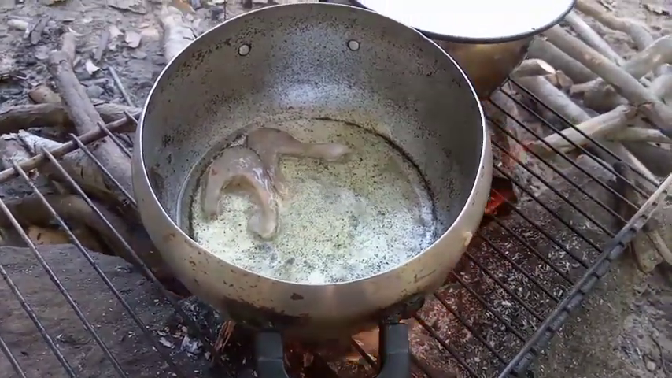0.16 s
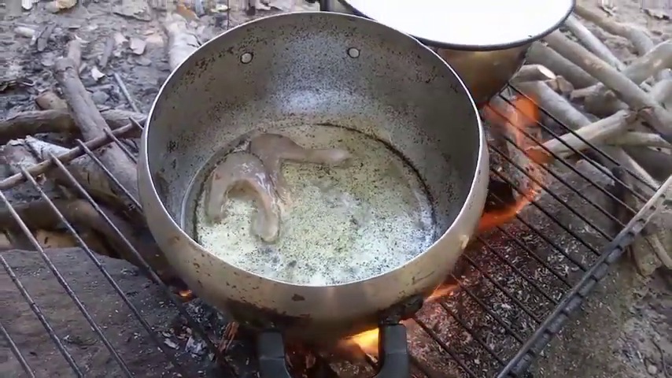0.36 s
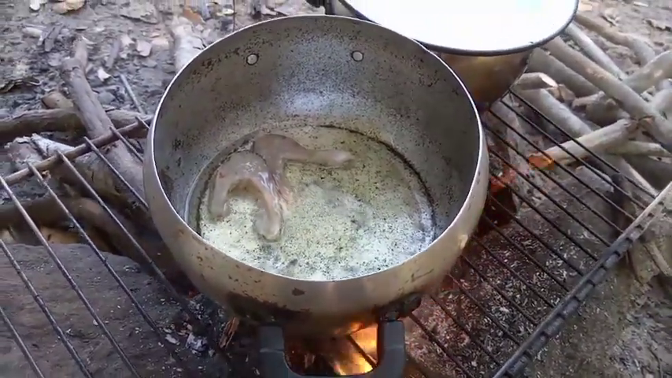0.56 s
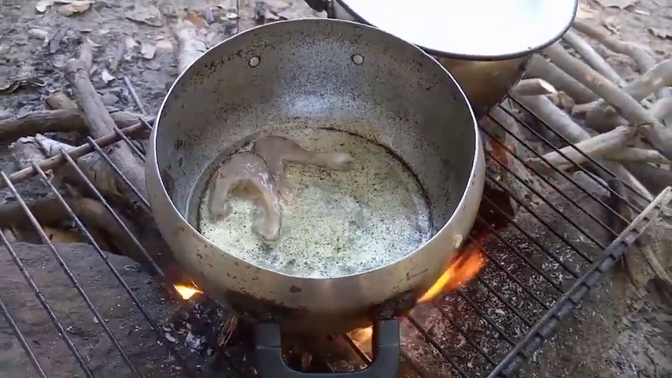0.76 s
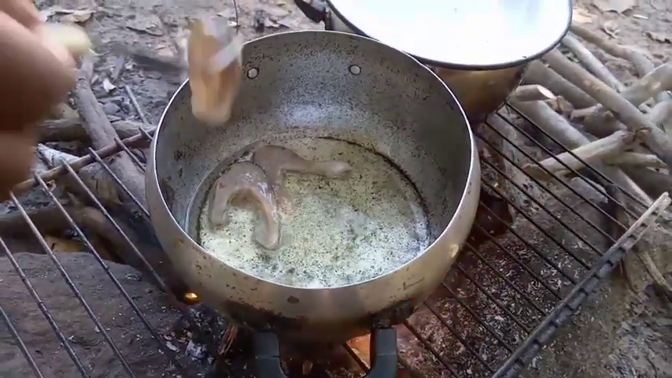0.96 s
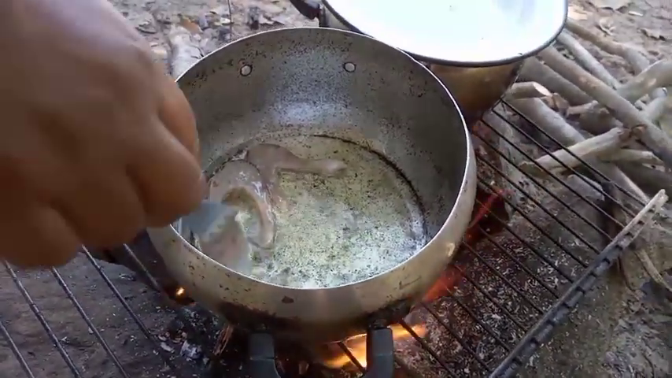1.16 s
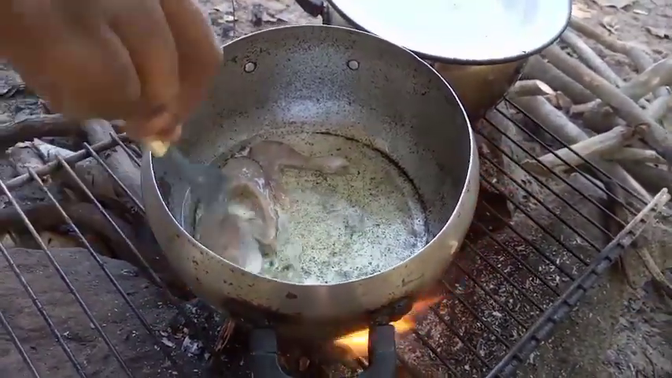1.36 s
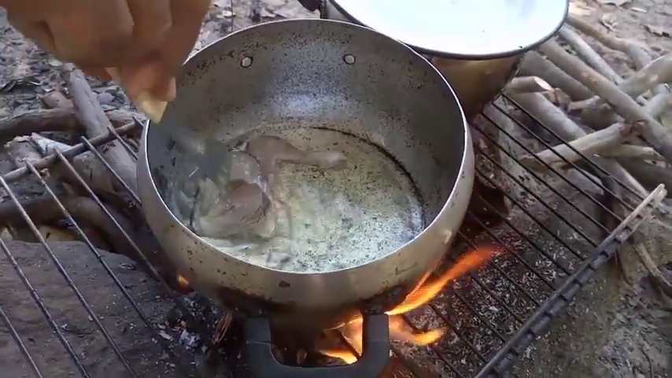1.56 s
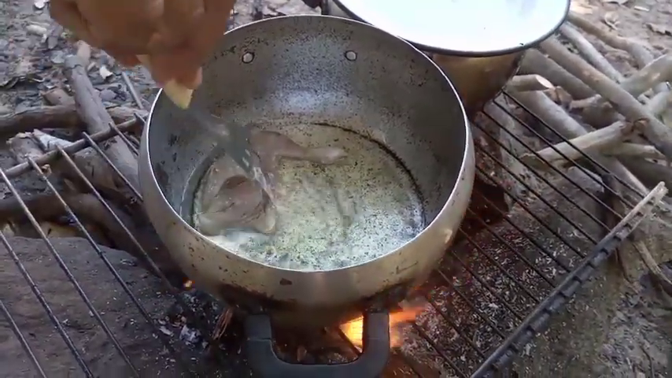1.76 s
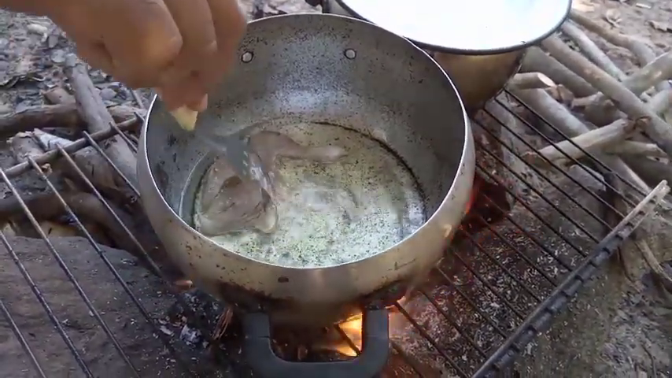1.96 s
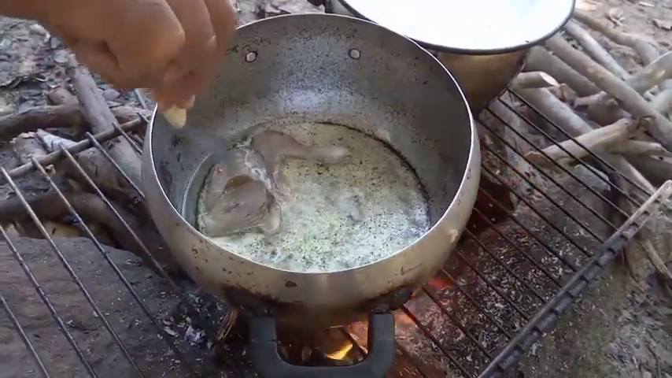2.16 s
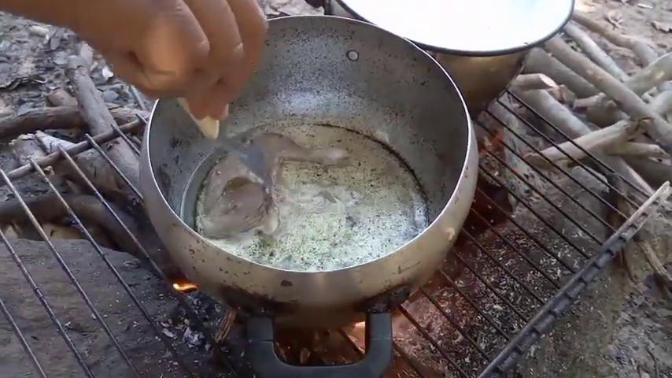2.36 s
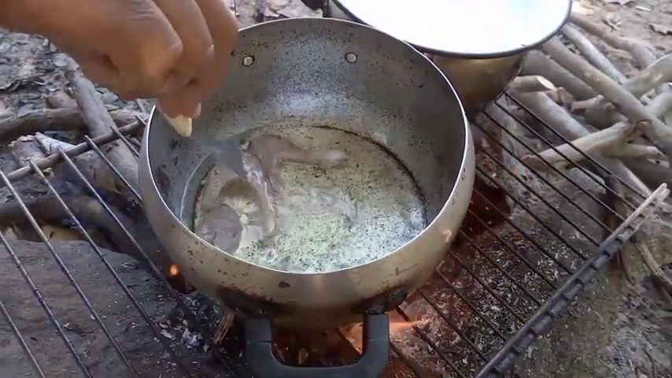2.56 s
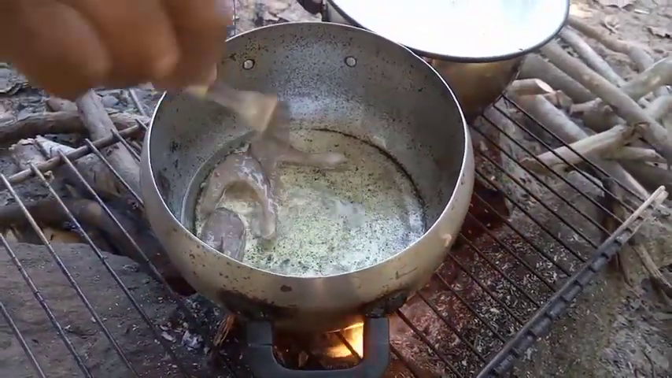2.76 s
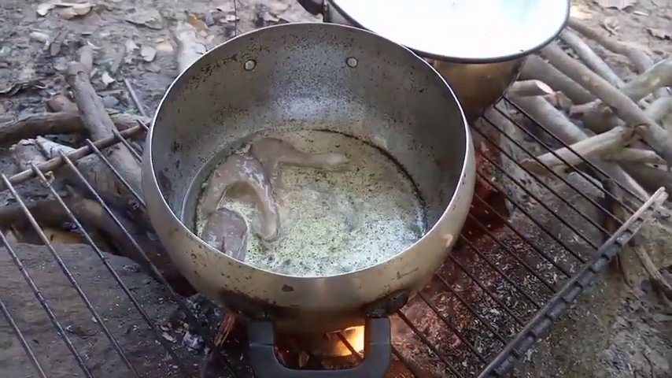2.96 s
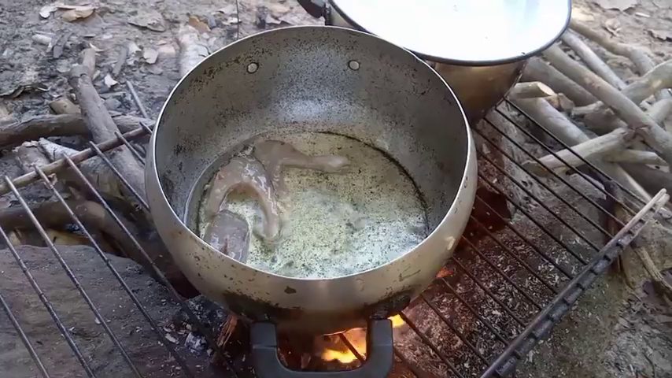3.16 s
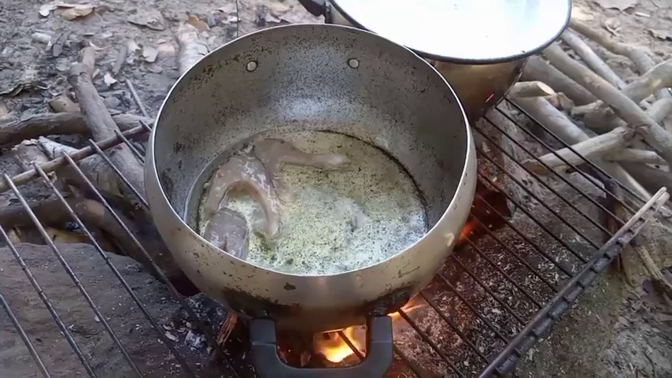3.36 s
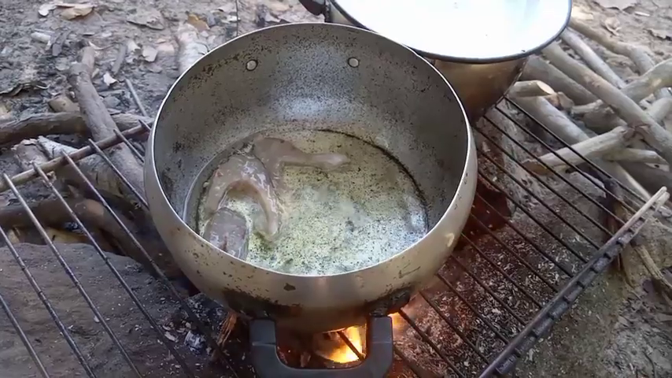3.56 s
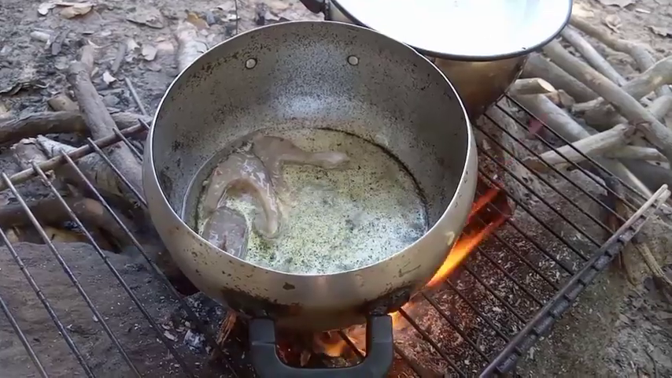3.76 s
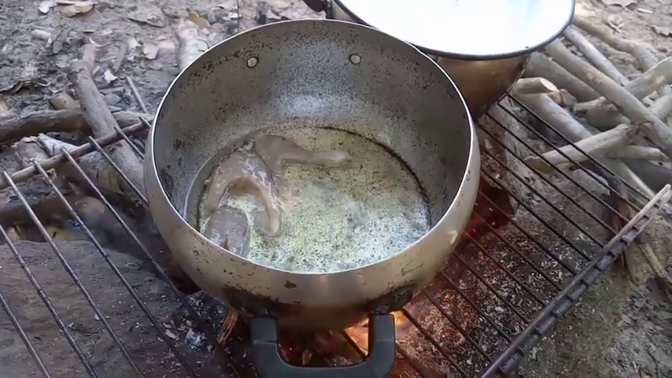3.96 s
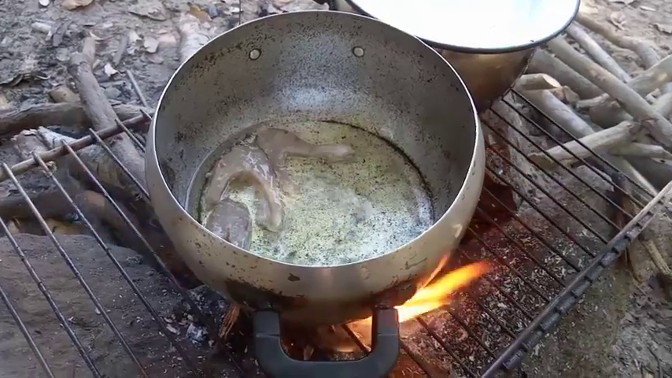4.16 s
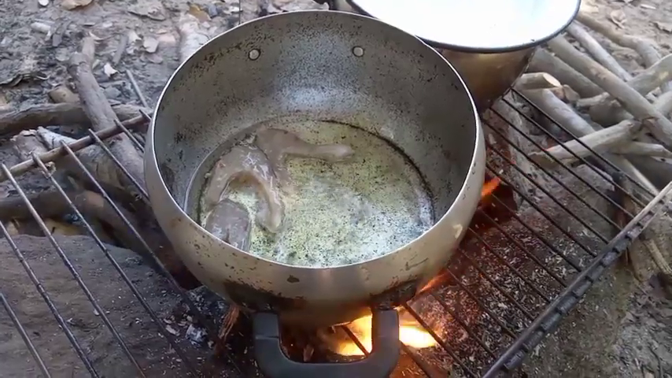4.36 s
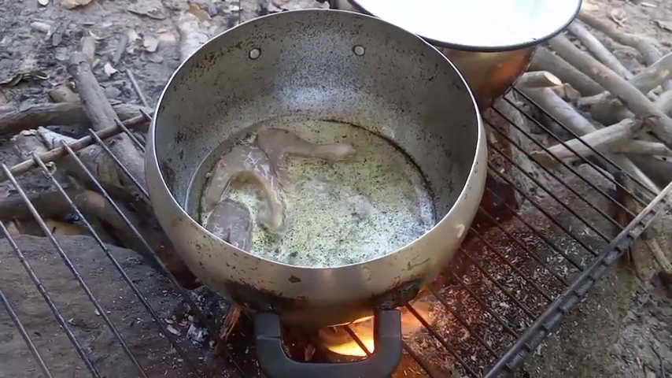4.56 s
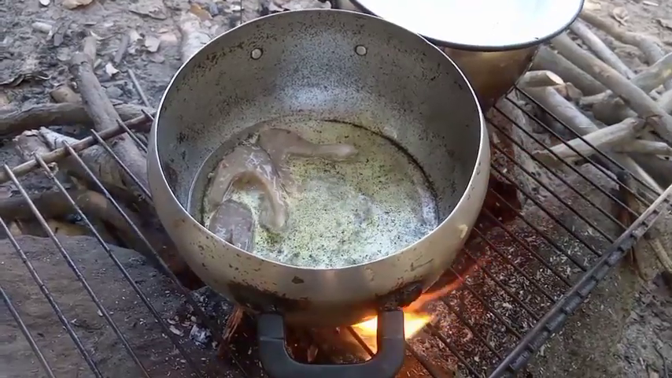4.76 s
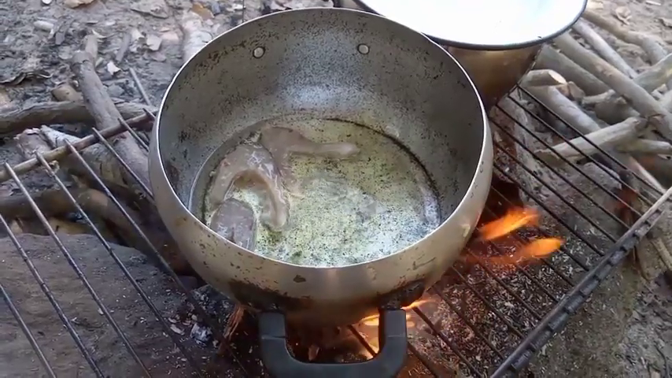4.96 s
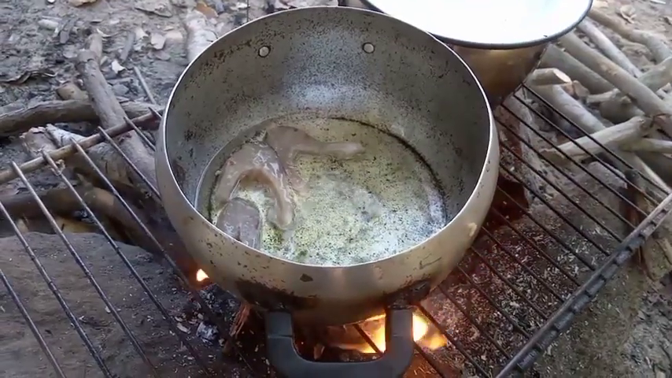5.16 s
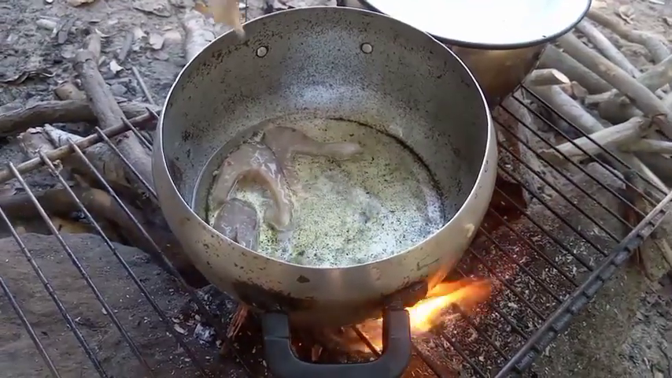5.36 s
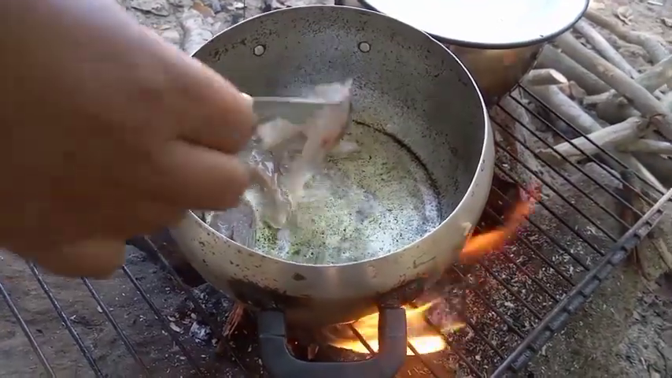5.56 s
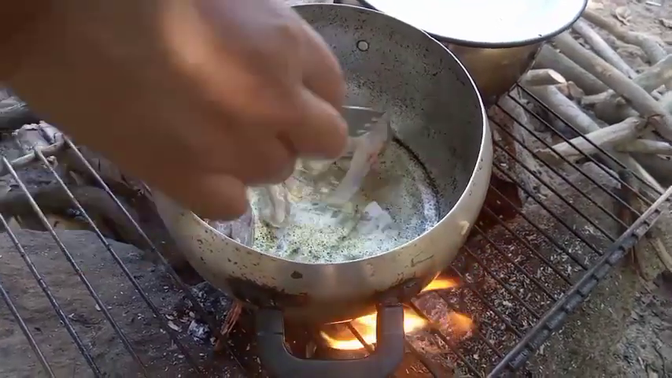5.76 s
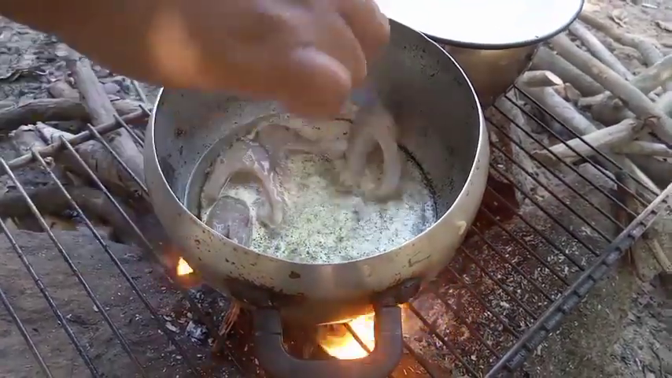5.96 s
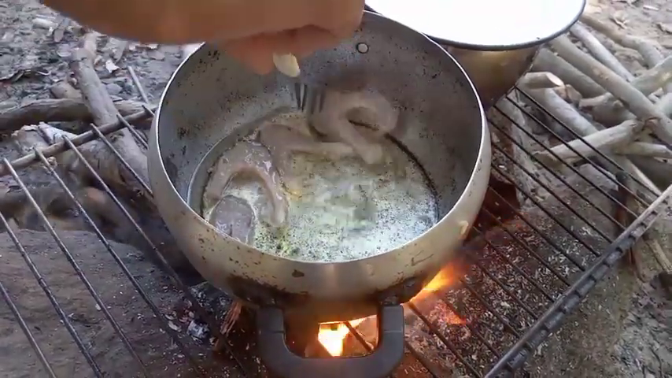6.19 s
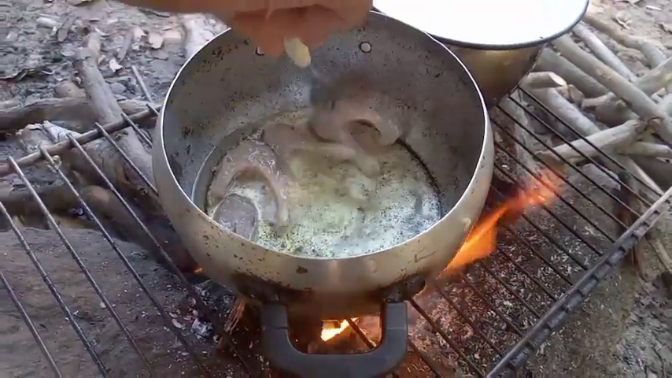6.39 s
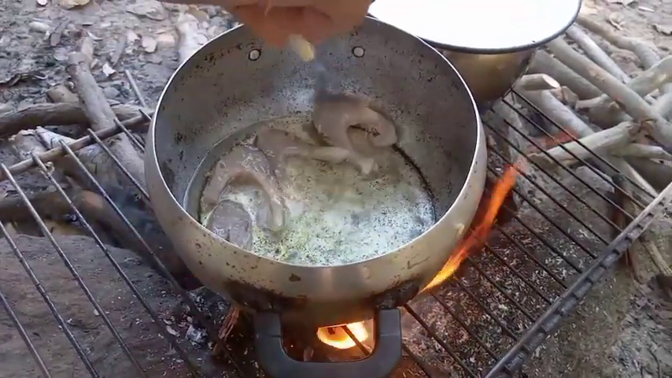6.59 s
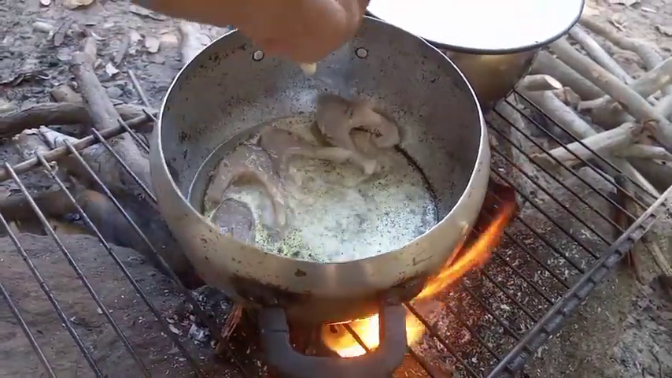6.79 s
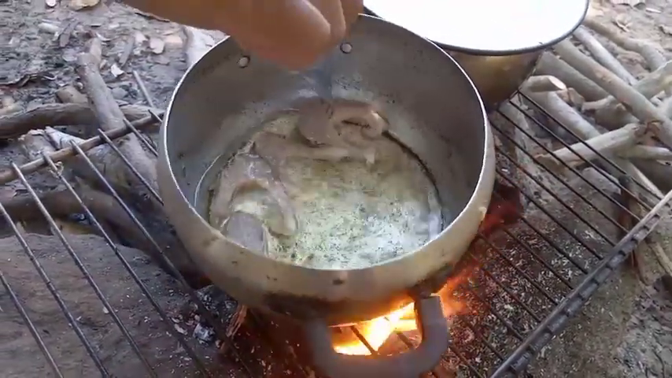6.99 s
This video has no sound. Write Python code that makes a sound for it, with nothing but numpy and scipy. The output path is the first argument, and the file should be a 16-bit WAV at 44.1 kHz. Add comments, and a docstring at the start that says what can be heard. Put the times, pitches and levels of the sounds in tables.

```python
"""Fish fries in a thin layer of oil in a deep metal pot over a wood fire, outdoors.
Water drops burst as ringing steam bubbles and torn oil film: bright pops and wetter spits, over a fine fizz of
bubble grains and noise. Echoes and resonant filters make the pot throw the bursts back and ring briefly.
Near the end a fresh piece flashes into a loud hiss of steam. Filtered noise makes the fire's rumble, the hollow
air and a faint hum; short clicks make the snaps of the wood."""
import sys
import numpy as np
from scipy import signal
from scipy.fft import rfft, irfft, next_fast_len
from scipy.io import wavfile

SR = 44100
rng = np.random.default_rng(int(sys.argv[2]) if len(sys.argv) > 2 else 0)


def put_to_file(sound):
    """Save the sound as 16-bit audio at rate SR, in the file named by the first command-line argument."""
    columns = np.atleast_2d(sound).T  # one column per channel
    safe = np.clip(columns, -1, 1)
    whole_steps = np.round(safe * 32767)
    wavfile.write(sys.argv[1], SR, whole_steps.astype(np.int16))


N = 310023
TIME = np.arange(N) / SR  # s
BURST_TIME = np.arange(2048) / SR  # s, the span of one burst
LEVEL_WINDOW = .01 * SR  # samples in 10 ms

# Loud steam bursts. Each row: start in seconds, reference level in dB (rms over 10 ms), bubble pitch in Hz,
# splash in dB against that level.
LOUD_POPS = [(0.0326, -32.5, 5700, -2), (0.0735, -25.5, 6240, -23), (0.103, -28, 6540, -38),
             (0.1123, -28.5, 6200, -34), (0.2118, -34.5, 3020, 4), (0.304, -32.5, 6300, -14),
             (0.3313, -34.5, 4230, -15), (0.4103, -35.5, 3960, 2), (0.422, -32.5, 9800, -25),
             (0.5679, -31.5, 3380, -13), (0.6338, -29.5, 5000, -13), (0.671, -33.5, 4600, -16),
             (0.7685, -38, 5470, -10), (0.8108, -27.5, 5900, -31), (0.885, -34.5, 3740, -5),
             (0.904, -33.0, 6000, -14), (0.9365, -32.5, 6640, -1), (0.9429, -27.5, 6600, -21),
             (0.958, -30.5, 3760, -14), (0.9957, -30, 3060, -2), (1.0171, -28.5, 6100, -5),
             (1.096, -36, 9730, -29), (1.219, -33, 5870, 4), (1.289, -29, 4870, -10),
             (1.2953, -30.5, 3480, -10), (1.3042, -32, 4040, -17), (1.4556, -30.5, 7360, -26),
             (1.5063, -29, 6200, -30), (1.555, -26, 5620, -23), (1.5767, -27.5, 4000, -8),
             (1.638, -30, 5950, -25), (1.6734, -34, 5810, -15), (1.6985, -36, 6140, -14),
             (1.767, -24.5, 6000, -24), (1.8898, -30.0, 6000, -23), (1.968, -33.5, 5640, -4),
             (2.0705, -30, 6840, -14), (2.0993, -34, 5770, -21), (2.3174, -32, 3250, 0.5),
             (2.3483, -29, 3830, -4.5), (2.5663, -30, 3400, -1.5), (2.5852, -33.5, 3290, -2),
             (2.685, -31.5, 5260, -14), (2.7562, -29, 6600, -27), (2.877, -30.5, 6500, -25),
             (2.916, -35, 9000, -19), (2.959, -38, 4940, -5), (2.9876, -30.5, 3300, -1),
             (3.092, -34, 5130, -13), (3.1569, -28.5, 6100, -22), (3.1859, -26.5, 6200, -8),
             (3.3463, -29.5, 5100, -6), (3.425, -29.5, 6500, -25), (3.4492, -36, 4690, 2),
             (3.5037, -29.5, 7000, -15), (3.523, -38, 3200, 8.5), (3.825, -31.5, 6520, -9),
             (3.838, -35.5, 6000, -5), (3.9841, -37, 5350, -7), (4.0015, -31.5, 4350, -11),
             (4.0489, -34.5, 6300, -25), (4.1191, -28.5, 6050, -17), (4.138, -34.5, 5930, -2.5),
             (4.2172, -32.5, 6800, -14), (4.2605, -34, 6050, -15), (4.3644, -34.0, 5940, -18),
             (4.4134, -33.5, 6200, -29), (4.4999, -35.0, 10000, -16), (4.526, -31.0, 4300, -4),
             (4.5439, -23.5, 5520, -10), (4.561, -30.5, 5940, -3), (4.6866, -35.0, 8530, -27),
             (4.7925, -29.5, 3600, -9.5), (4.8873, -31, 5940, -30), (4.9166, -33.5, 4680, -6),
             (4.962, -31, 5700, -11), (5.063, -33, 3600, -3), (5.184, -33.5, 3230, -1.5),
             (5.286, -30.5, 6300, -17), (5.31, -34, 2960, -3), (5.3646, -32.5, 7320, -32),
             (5.4323, -33, 4800, -2), (5.4646, -33.5, 6100, 0), (5.4933, -26.5, 6240, -17),
             (5.7759, -34.5, 5870, -9), (5.998, -28.5, 6160, -7.5), (6.0637, -30.0, 5860, -11),
             (6.1266, -29, 5850, -21), (6.1417, -30.5, 6590, -25), (6.1695, -27, 5700, -12),
             (6.4616, -33, 4100, -13), (6.6832, -29, 5900, -0.5), (6.797, -35, 6120, -4),
             (6.8685, -29, 5720, -7), (6.9431, -33.5, 3700, -1), (6.9962, -36.5, 4720, -11)]
# Bands of the torn film: splash, snap, crack. Each row: lower edge in Hz, upper edge in Hz.
FILM_BANDS = [(2800, 5400), (5000, 6950), (8000, 10100)]
# parts of every pop, in dB against its reference level; the crack varies at random
BUBBLE_DB, SPLASH_DB, SNAP_DB, CRACK_DB, CRACK_SPREAD_DB = -2.5, -1.5, -2, -11.5, 2
# a wetter pop tears more film and rings less: dB of snap and of bubble per dB of splash
SNAP_PER_SPLASH, BUBBLE_PER_SPLASH = 0.22, -.1
MIST_HZ, MIST_DB = (13800, 15800), -30.5  # fine mist of oil: band, and level against the pop
LEAK_DB = -17.0  # steam leaking just before a pop, against its bubble
TEAR_S = .0018  # decay time of a tearing oil film


def pops(cycles=2.67, rise=0.0083, film_cutoff_hz=9500, leak_s=0.0014, balance_spread_db=0.5):
    """Explosive boiling: steam leaks, a bubble rings, its film tears; own echoes, tiny random left-right balance."""
    out = np.zeros((2, N))
    for s, level_db, hz, splash_db in list(LOUD_POPS) + small_pops():
        path = wall_echoes()
        ring_db = level_db + BUBBLE_DB + BUBBLE_PER_SPLASH * splash_db
        ring = bubble(hz, cycles * from_db(2 * rng.normal()), rise)
        pop = at_level(heard(ring, path), ring_db)

        dull = signal.butter(1, film_cutoff_hz, fs=SR, output="sos")
        film = signal.sosfilt(dull, heard(tear(TEAR_S), path))
        film_db = (SPLASH_DB + splash_db,
                   SNAP_DB + SNAP_PER_SPLASH * splash_db,
                   CRACK_DB + CRACK_SPREAD_DB * rng.normal())
        for (low_hz, high_hz), db in zip(FILM_BANDS, film_db):
            pop += at_level(band(film, low_hz, high_hz), level_db + db)
        pop += at_level(band(film, *MIST_HZ), level_db + MIST_DB)

        left_right = np.array([[.5], [-.5]])
        add(out, s, pop * from_db(balance_spread_db * rng.normal() * left_right))

        # played backwards: steam leaks faster and faster until the film gives way
        leak = at_level(band(tear(leak_s), 3600, 7700), ring_db + LEAK_DB)
        leak = leak[:len(BURST_TIME) // 2][::-1]
        add(out, s - len(leak) / SR, leak)
    return out


SMALL_DB, SMALL_SPREAD_DB = 5, 3.5  # level over the frying curve, and spread
SMALL_HZ, SMALL_SPREAD_OCTAVES = 6500, .45  # typical bubble pitch, and spread
SMALL_SPLASH_DB, SMALL_SPLASH_SPREAD_DB = -11, 1.5  # splash against the pop, and spread


def small_pops(count=100):
    """Random nucleation: weaker bursts come by chance, louder with the frying; columns as for the loud ones."""
    s = rng.uniform(0, TIME[-1], count)
    size, pitch, wetness = rng.standard_normal((count, 3)).clip(-2, 2).T
    frying_db = np.interp(s, *np.transpose(FRYING_VIGOUR))
    level_db = frying_db + SMALL_DB + SMALL_SPREAD_DB * size
    hz = SMALL_HZ * 2 ** (SMALL_SPREAD_OCTAVES * pitch)
    splash_db = SMALL_SPLASH_DB + SMALL_SPLASH_SPREAD_DB * wetness
    return list(zip(s, level_db, hz, splash_db))


def bubble(hz, cycles, rise):
    """Damped cavity oscillation: steam swells into ringing and dies within a few cycles, rising a little."""
    age = BURST_TIME * hz / cycles
    pitch = hz * (1 + rise * np.tanh(age / 2 - .5))
    return age * np.exp(-age) * np.sin(2 * np.pi * np.cumsum(pitch) / SR)


def tear(decay_s):
    """Film rupture: tearing oil gives a puff of noise that decays exponentially."""
    return rng.standard_normal(len(BURST_TIME)) * np.exp(-BURST_TIME / decay_s)


# Larger, wetter bursts. Each row: start in seconds, then relative levels in dB of cavity, spray and thud.
WET_SPITS = [(0.1491, -32.5, -38.5, -48), (0.2134, -45, -33.5, -53), (0.3441, -30, -34, -46.5),
             (0.4354, -34, -36.5, -49), (0.7344, -52, -36.5, -62), (1.0181, -51, -31.5, -50),
             (1.296, -35, -26.5, -36.5), (1.484, -45, -35, -55), (1.5818, -45, -29, -49),
             (1.6736, -37, -32.5, -45), (1.7, -37, -32, -57), (1.8432, -41, -35, -52),
             (2.9592, -37, -32.5, -53), (3.1847, -29.5, -36.5, -44.5), (3.4032, -37, -36.5, -52),
             (3.4979, -38, -30.5, -44.5), (3.8392, -34.5, -41, -52), (3.9873, -23, -36, -44),
             (4.1101, -31.5, -38, -46.5), (4.2298, -45, -40, -58), (4.364, -38, -37, -57),
             (4.4503, -31.5, -41, -49.5), (4.577, -34.5, -39, -61), (5.3098, -39, -34.5, -64),
             (5.4455, -33, -42, -48)]
CAVITY_HZ, CAVITY_SPREAD_OCTAVES = 1352, 0.038  # typical cavity pitch, and spread


def spits(cycles=2.2, rise=0.0067, spray_s=0.008, cavity_db=-11.5, spray_db=-1.5, thud_db=-2.5):
    """Cavity resonance: bigger drops open a low cavity, throw a spray of oil and thump the air in the pot."""
    out = np.zeros(N)
    for s, row_cavity_db, row_spray_db, row_thud_db in WET_SPITS:
        path = wall_echoes()
        hz = CAVITY_HZ * 2 ** (CAVITY_SPREAD_OCTAVES * rng.normal())
        spray = heard(tear(spray_s), path)
        cavity = heard(bubble(hz, cycles, rise), path)
        spit = at_level(band(cavity, 970, 2700), row_cavity_db + cavity_db)
        spit += at_level(band(spray, 1310, 5900), row_spray_db + spray_db)
        spit += at_level(band(spray, 525, 840), row_thud_db + thud_db)
        add(out, s, spit)
    return out


# Bounces between the pot's walls, early then late. Each row: level in dB against the direct sound,
# decay time in seconds.
WALL_BOUNCES = [(-2.0, .0022), (-8.0, .008)]


def wall_echoes(first_s=.0007):
    """Multiple reflection: from one spot come the direct sound, then ever weaker bounces off the pot's walls."""
    path = np.zeros(len(BURST_TIME))
    for db, decay_s in WALL_BOUNCES:
        bounces = tear(decay_s) * (BURST_TIME > first_s)
        path += from_db(db) * bounces / np.sqrt(np.sum(bounces ** 2))
    path[0] = 1
    return path


def heard(x, path):
    """Convolution: a sound is repeated along every echo of its path through the pot."""
    return signal.fftconvolve(x, path)[:len(x)]


# Resonances of the pot and the air in it. Each row: frequency in Hz, width in Hz, boost in dB.
POT_RESONANCES = [(675, 51, 5), (1209, 50, 6), (1407, 29, 10.5), (2078, 26, 8.5), (2750, 7.7, 9.5),
                  (3210, 150, 3.5), (3580, 310, 1.5), (6340, 72, -2.5)]


def pot_ring(x):
    """Modal resonance: each mode of the pot boosts or weakens its band; narrow boosts ring on."""
    return x + sum((from_db(boost_db) - 1) * resonance(x, hz, width_hz)
                   for hz, width_hz, boost_db in POT_RESONANCES)


# Vigour of the steady frying. Each row: time in seconds, relative fizz level in dB.
FRYING_VIGOUR = [(0.0, -44), (0.37, -44.5), (0.86, -43.5), (1.23, -46), (1.58, -42), (2.51, -44.5),
                 (2.78, -43.5), (3.59, -46), (6.05, -47)]
# Colour of the fizz before the pot rings. Each row: frequency in Hz, relative spectral level in dB per Hz.
FIZZ_SPECTRUM = [(500, -25), (800, -8), (1200, 0), (1800, -5.5), (2450, -7), (3200, -2), (4600, -5.5),
                 (6000, -1.5), (8200, -10), (10000, -9.5), (12000, -21), (13800, -30), (15200, -23),
                 (16000, -24)]


def fizz(level_db=-0.5, smooth_db=-4.5, seethe_db=3.5):
    """Superposition of many small sources: foam ticks, blurred by the pot's walls, over a seething wash."""
    level, = gains(FRYING_VIGOUR)
    # two layers of ticks, each with its own echoes
    ticks = sum(heard(grains(per_s=900, spread_db=3.8, clump_db=3.0, cycles=1.2), wall_echoes())
                for spot in range(2))
    wash = rng.standard_normal(N) * from_db(smooth_db + seethe_db * drift(30))
    foam = coloured(rms_one(ticks) + wash, FIZZ_SPECTRUM)
    return from_db(level_db) * level * rms_one(pot_ring(foam))


def grains(per_s, spread_db, clump_db, cycles, largest=4.3):
    """Shot noise: countless tiny bubbles burst in clumps, each ringing briefly at one of 24 pitches."""
    chance = per_s * from_db(clump_db * drift(40)) / SR
    born = np.flatnonzero(rng.random(N) < chance)
    sizes = from_db(spread_db * np.minimum(rng.exponential(1, N), largest)) * rng.choice([-1, 1], N)
    pitches = np.geomspace(2700, 15500, 24)  # Hz
    dealt = rng.choice(len(pitches), N, p=pitches / pitches.sum())
    out = np.zeros(N)
    for k, hz in enumerate(pitches):
        clicks = np.full(N, 1e-18)
        mine = born[dealt[born] == k]
        clicks[mine] = sizes[mine]
        width_hz = hz / (np.pi * cycles)
        out += resonance(clicks, hz, width_hz) / np.sqrt(width_hz)
    return rms_one(out)


# Colour of the fresh hiss before the pot rings and the bands are levelled. Each row: frequency in Hz,
# relative spectral level in dB per Hz.
FRESH_SPECTRUM = [(500, -11), (900, -11), (1400, -8.5), (1800, -11.5), (2450, -11.5), (3100, -8),
                  (3700, -2.5), (4600, -7.5), (6000, -3), (8200, -15.5), (10000, -5.5), (13600, -18.5),
                  (15000, -13.5), (16000, -16)]


def fresh_piece(hiss_db=0.0, spray_db=-3.5, sputter_db=1.8, rush_db=-4.0, crackle_db=-4.0, split_hz=8200):
    """Flash boiling: water on the fresh piece turns to hissing steam, with larger bubbles crackling through."""
    hiss, spray = steam_flow()
    steam = grains(per_s=11000, spread_db=4.0, clump_db=4.0, cycles=0.6)
    steam += from_db(rush_db) * rng.standard_normal(N)
    crackle = rms_one(heard(grains(per_s=500, spread_db=4.0, clump_db=3.0, cycles=2.0), wall_echoes()))
    boil = pot_ring(coloured(steam + from_db(crackle_db) * crackle, FRESH_SPECTRUM))
    coarse, fine = split(boil, split_hz, order=4)
    sputter = from_db(sputter_db * drift(150))
    return sputter * (from_db(hiss_db) * hiss * coarse + from_db(spray_db) * spray * fine)


# The piece sinks in bit by bit and each wet patch flashes to steam. Each row: start in seconds,
# length in seconds, relative hiss level in dB, relative fine spray level in dB.
STEAM_SURGES = [(6.074, .08, -37, -48), (6.154, 0.13, -34.5, -31), (6.344, 0.048, -32, -41),
                (6.421, 0.089, -31.5, -53), (6.518, 0.18, -33, -33.5), (6.785, 0.048, -39.5, -42),
                (6.851, 0.053, -35, -35), (6.972, .07, -31.5, -60)]
# steady boiling between the surges: start, then relative levels of hiss and fine spray
BOIL_START_S, BOIL_HISS_DB, BOIL_SPRAY_DB = 6.17, -39, -42.5


def steam_flow():
    """Addition of powers: independent surges join the steady boil, as gains of hiss and of fine spray."""
    boiling = np.clip((TIME - BOIL_START_S) / SURGE_ATTACK_S, 0, 1)
    power = np.outer(from_db([BOIL_HISS_DB, BOIL_SPRAY_DB]), boiling) ** 2
    for s, length_s, hiss_db, spray_db in STEAM_SURGES:
        power += np.outer(from_db([hiss_db, spray_db]), surge(s, length_s)) ** 2
    return np.sqrt(power)


SURGE_ATTACK_S, SURGE_SAG_DB_PER_S, SURGE_RELEASE_S = 0.017, 12, 0.024


def surge(start_s, length_s):
    """Envelope of evaporation: steam flashes up, sags while the wet patch dries and then dies away."""
    age = np.maximum(TIME - start_s, 0)
    held = np.minimum(age / SURGE_ATTACK_S, 1) * from_db(-SURGE_SAG_DB_PER_S * age)
    return held * np.exp(-np.maximum(age - length_s, 0) / SURGE_RELEASE_S)


# Strength of the fire. Each row: time in seconds, relative deep roar in dB, relative flame rumble in dB.
FIRE_STRENGTH = [(0.0, -65, -58), (0.6, -68.5, -62), (2.35, -63.5, -56.5), (3.19, -68, -56),
                 (3.8, -60.5, -57.5), (6.34, -59, -56.5), (6.68, -64, -54.5), (7.03, -70, -53.5)]
# Colour of the flames before roar and rumble are levelled. Each row: frequency in Hz,
# relative spectral level in dB per Hz.
FLAME_SPECTRUM = [(20, -26), (31, -15), (42, -15), (52, -11), (65, 5.5), (80, -2), (100, 2), (160, -1),
                  (245, 0), (290, -9), (350, -16.5), (450, -9.5), (700, -54)]
# Hollow murmur around the pot. Each row: time in seconds, relative level in dB.
MURMUR_LEVEL = [(0.0, -53.5), (1.61, -51), (3.21, -61), (4.36, -56.5), (4.8, -58), (5.44, -55.5),
                (5.91, -50), (7.03, -56)]
# Colour of the air before the pot rings. Each row: frequency in Hz, relative spectral level in dB per Hz.
AIR_SPECTRUM = [(200, 0), (300, -0.5), (400, -7.5), (520, -2), (680, -0.5), (860, -3.5), (1200, -3.5),
                (1400, -2.5), (1900, -11.5), (2600, -36)]


def fire(roar_db=6.5, rumble_db=2.3, air_db=-1.0, flutter_db=2.3, split_hz=110, gust_db=2.0):
    """Turbulent noise: flames roar and rumble under the pot; air in light gusts sounds hollow in it."""
    roar, rumble = gains(FIRE_STRENGTH)
    air, = gains(MURMUR_LEVEL)
    flames = coloured(rng.standard_normal(N), FLAME_SPECTRUM) * from_db(flutter_db * drift(14))
    deep, upper = split(flames, split_hz, order=3)
    hollow = rms_one(pot_ring(coloured(rng.standard_normal(N), AIR_SPECTRUM)))
    hollow = hollow * from_db(gust_db * drift(13))
    burning = from_db(roar_db) * roar * deep + from_db(rumble_db) * rumble * upper
    return burning + from_db(air_db) * air * hollow


# Dry, sharp snaps of the burning wood. Each row: start in seconds, peak level in dB before the microphone.
WOOD_SNAPS = [(0.5850, -18), (1.7679, -6), (1.8435, -18.5), (3.4162, -23), (4.8464, -14), (4.9790, -15.5),
              (6.7262, -8.5)]


def snaps(low_hz=5800, high_hz=12000, tail_db=-12.0, tail_s=.0028):
    """Impulsive fracture: a wood fibre splits with one hard click and a short scatter."""
    out = np.zeros(N)
    for s, peak_db in WOOD_SNAPS:
        scatter = tear(tail_s)
        click = from_db(tail_db) * scatter / np.sqrt(np.sum(scatter ** 2))
        click[0] += 1
        snap = band(click, low_hz, high_hz)
        add(out, s, from_db(peak_db) * snap / np.abs(snap).max())
    return out


# Tones of the hum. Each row: frequency in Hz, width of each of two resonances in Hz, relative level in dB.
HUM_PARTIALS = [(498.7, 11.7, -4), (553, 76, -3), (674, 20, -15.5)]
HUM_DB, HUM_FADE_DB_PER_S = -0.5, 0.9  # start level against the murmur curve, and slow fading


def hum():
    """Narrow-band noise: a few wavering tones hang in the air, swell with the murmur and slowly fade."""
    murmur, = gains(MURMUR_LEVEL)
    level = murmur * from_db(HUM_DB - HUM_FADE_DB_PER_S * TIME)
    tones = np.zeros(N)
    for hz, width_hz, db in HUM_PARTIALS:
        once = resonance(rng.standard_normal(N), hz, width_hz)
        tones += from_db(db) * rms_one(resonance(once, hz, width_hz))
    return level * tones


def from_db(db):
    """Logarithmic level: decibels to amplitude gain."""
    return 10 ** (np.asarray(db) / 20)


def rms_one(x):
    """Normalisation of power: scale to rms 1."""
    return x / np.sqrt(np.mean(x ** 2) + 1e-20)


def at_level(x, db):
    """Equal energy: scale a short sound to the energy of 10 ms at this rms level."""
    return from_db(db) * x * np.sqrt(LEVEL_WINDOW / (np.sum(x ** 2) + 1e-20))


def gains(rows):
    """Linear interpolation in level: one gain curve per dB column."""
    s, *columns = np.transpose(rows)
    return [from_db(np.interp(TIME, s, c)) for c in columns]


def band(x, low_hz, high_hz, order=2):
    """Band limitation: a causal band-pass."""
    edges_hz = [low_hz, min(high_hz, SR / 2 - 1000)]
    return signal.sosfilt(signal.butter(order, edges_hz, "band", fs=SR, output="sos"), x)


def split(x, hz, order):
    """Crossover: the parts below and above a frequency, each scaled to rms 1."""
    return [rms_one(signal.sosfilt(signal.butter(order, hz, kind, fs=SR, output="sos"), x))
            for kind in ("low", "high")]


def coloured(x, spectrum):
    """Spectral shaping: weight a steady sound along log frequency, then scale to rms 1."""
    hz, db = np.transpose(spectrum)
    size = next_fast_len(N)
    grid = np.maximum(np.arange(size // 2 + 1) * SR / size, 1)
    weight_db = np.interp(np.log(grid), np.log(hz), db, left=-90, right=-90)
    return rms_one(irfft(rfft(x, size) * from_db(weight_db), size)[..., :N])


def resonance(x, hz, width_hz):
    """Damped oscillator: a two-pole resonance with gain 1 on top."""
    r = np.exp(-np.pi * width_hz / SR)
    feed = np.array([1, 0, -1]) * (1 - r * r) / 2
    back = [1, -2 * r * np.cos(2 * np.pi * hz / SR), r * r]
    return signal.lfilter(feed, back, x + 1e-18)


def drift(rate):
    """Slow random modulation: chance values, rate of them per second, joined by lines; spread near 1."""
    return np.interp(TIME * rate, np.arange(4096), rng.standard_normal(4096))


def add(track, s, sound):
    """Superposition: mix a short sound in at a time."""
    start = max(round(s * SR), 0)
    track[..., start:start + sound.shape[-1]] += sound[..., :N - start]


def scene():
    """Superposition: the pot is straight ahead, nearly mono; each pop's balance varies very slightly at random."""
    bursts = pot_ring(pops() + spits())
    return bursts + fizz() + fresh_piece() + fire() + snaps() + hum()


CUTOFF_HZ = 16000


def record(dry, port_hz=15100, port_width_hz=1100, port_db=9.5):
    """Port resonance: the microphone port rings in the top octave; a steep low-pass cuts above it."""
    bright = dry + (from_db(port_db) - 1) * resonance(dry, port_hz, port_width_hz)
    return signal.sosfilt(signal.ellip(10, .2, 80, CUTOFF_HZ, fs=SR, output="sos"), bright)


dry = scene()
out = record(dry)
put_to_file(out)
```